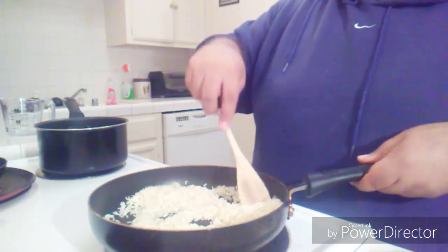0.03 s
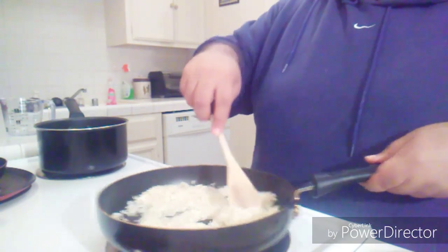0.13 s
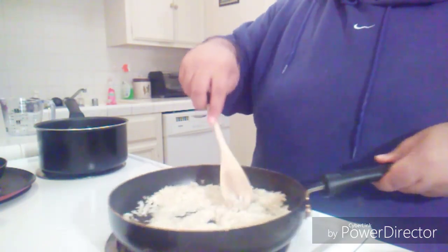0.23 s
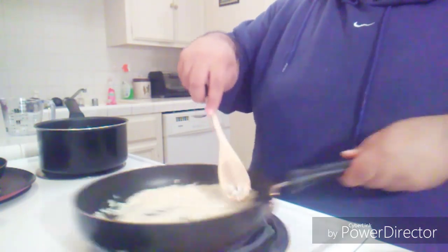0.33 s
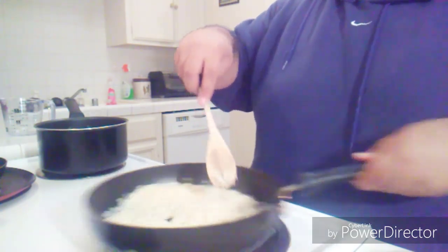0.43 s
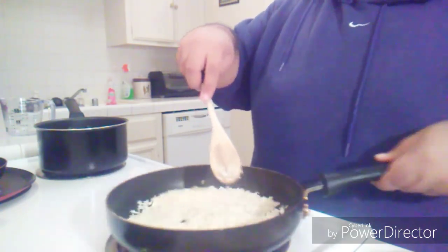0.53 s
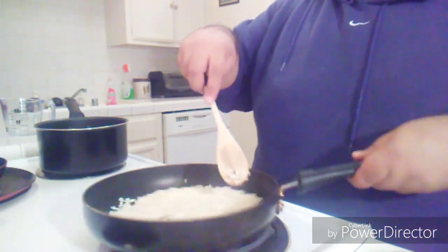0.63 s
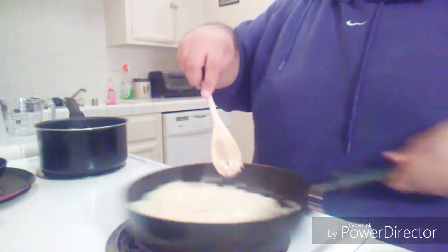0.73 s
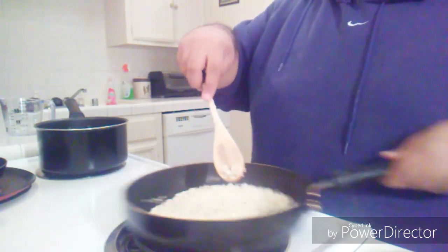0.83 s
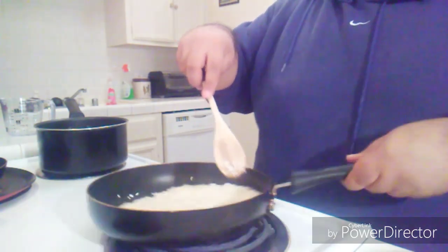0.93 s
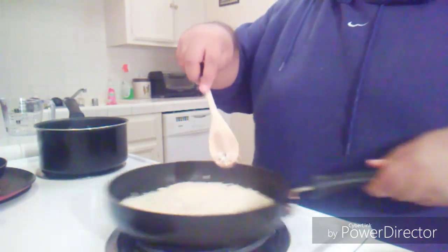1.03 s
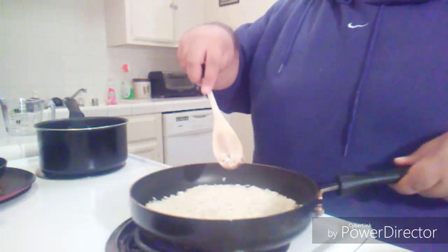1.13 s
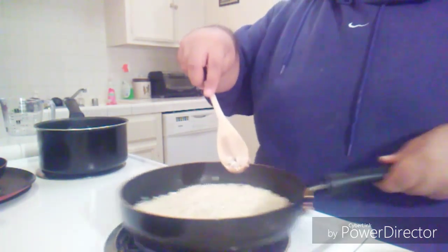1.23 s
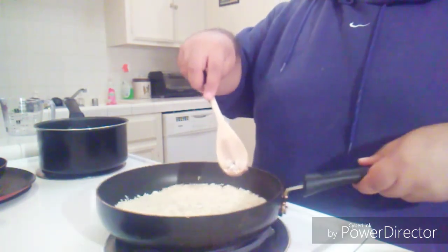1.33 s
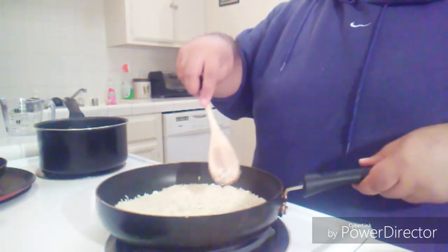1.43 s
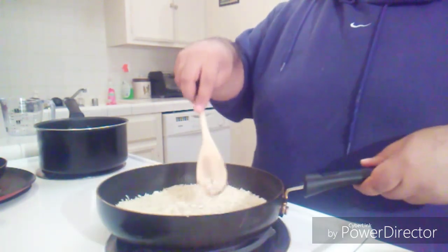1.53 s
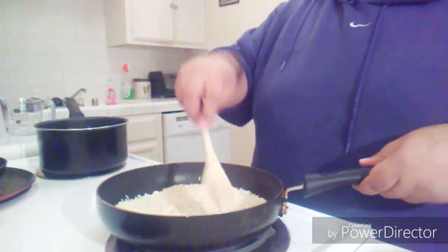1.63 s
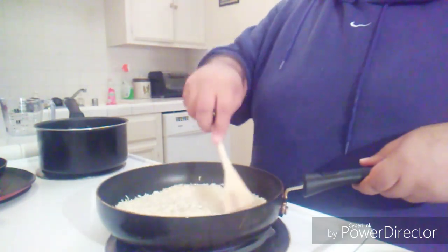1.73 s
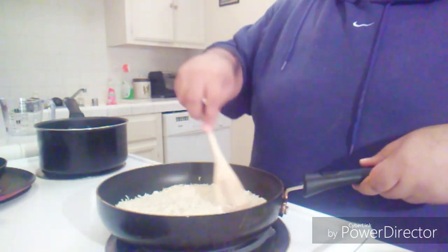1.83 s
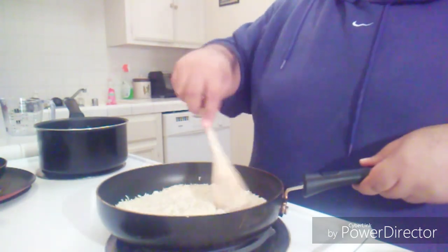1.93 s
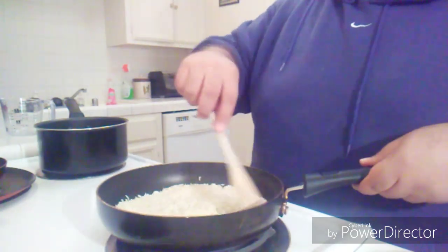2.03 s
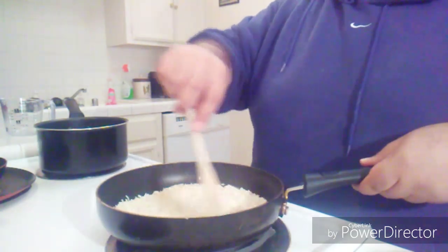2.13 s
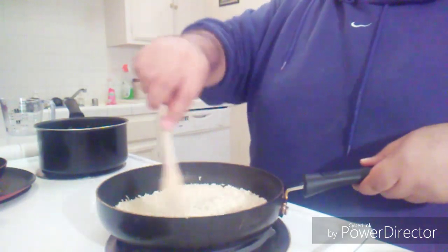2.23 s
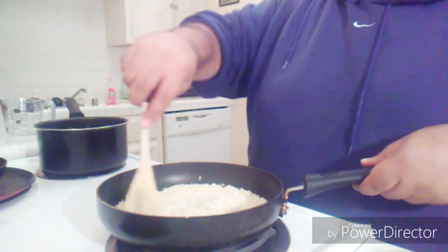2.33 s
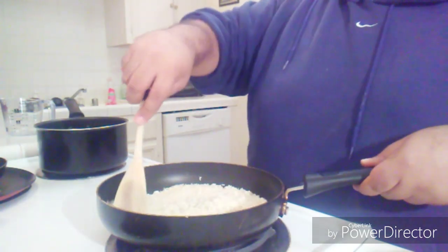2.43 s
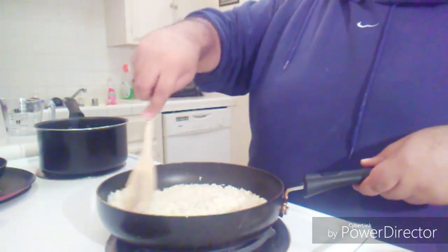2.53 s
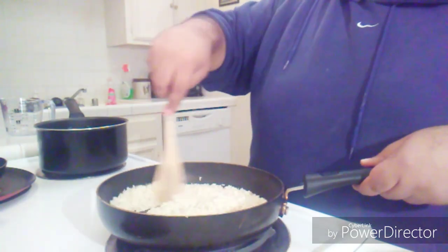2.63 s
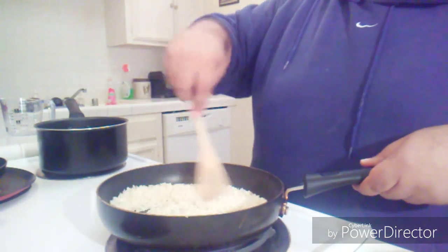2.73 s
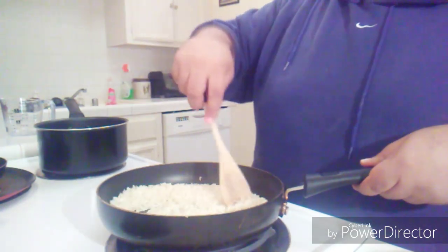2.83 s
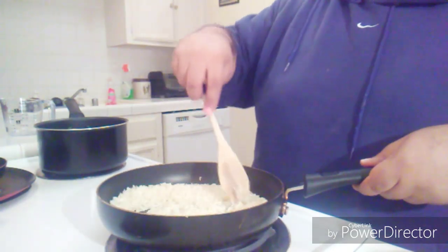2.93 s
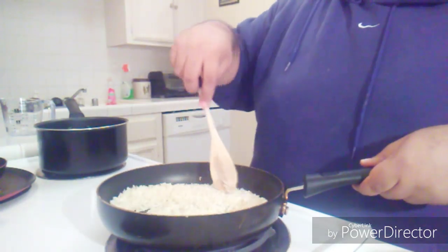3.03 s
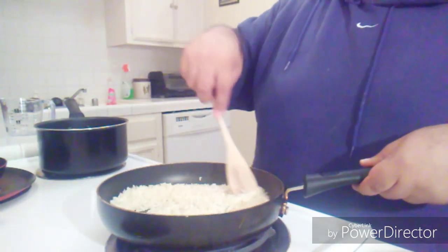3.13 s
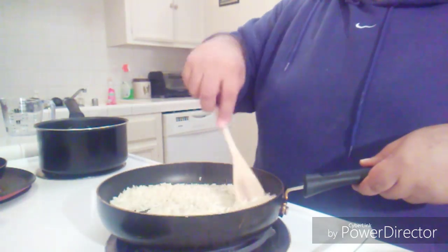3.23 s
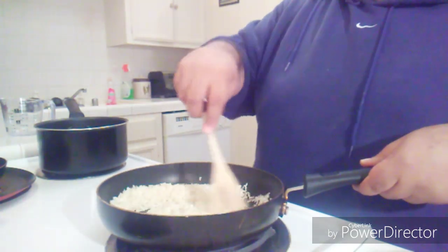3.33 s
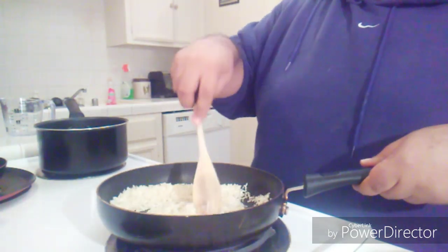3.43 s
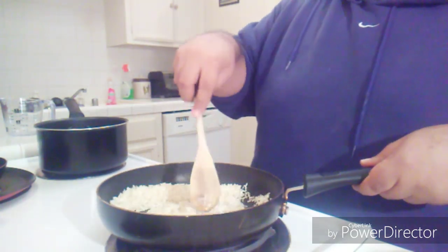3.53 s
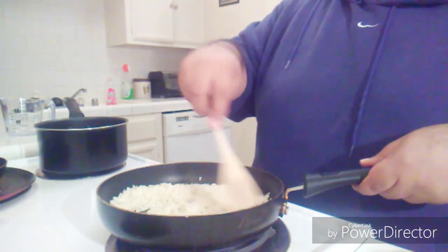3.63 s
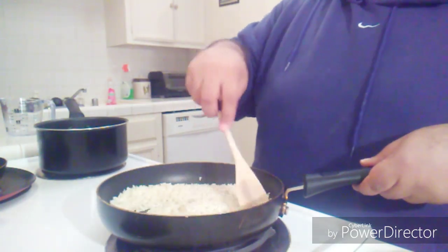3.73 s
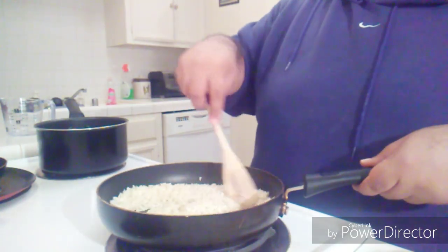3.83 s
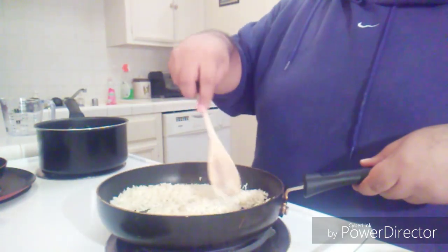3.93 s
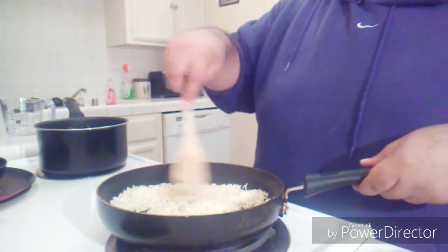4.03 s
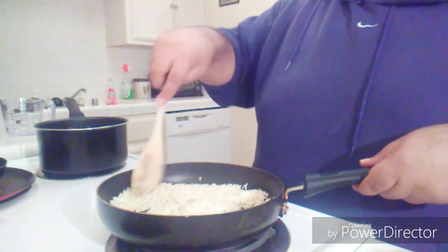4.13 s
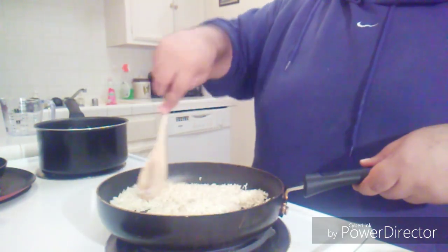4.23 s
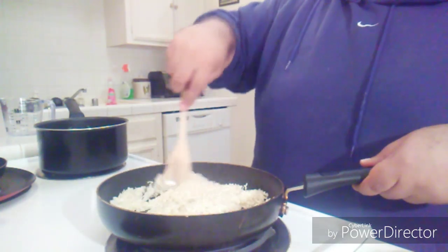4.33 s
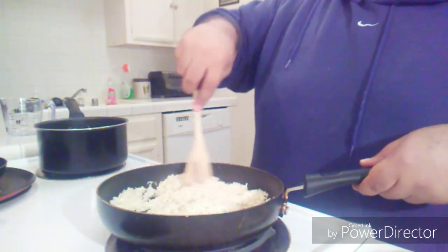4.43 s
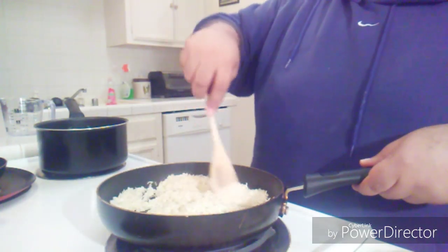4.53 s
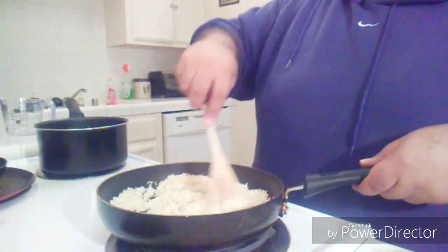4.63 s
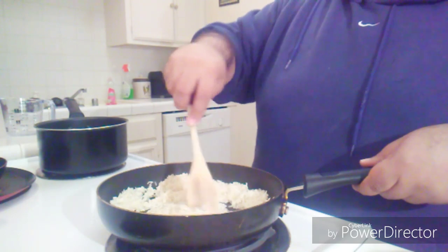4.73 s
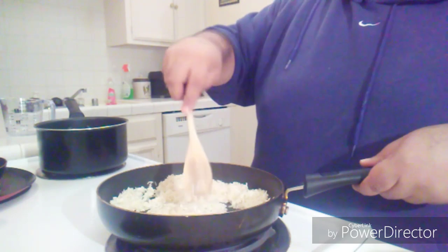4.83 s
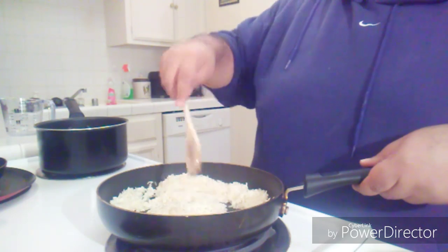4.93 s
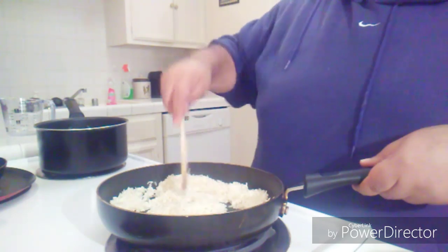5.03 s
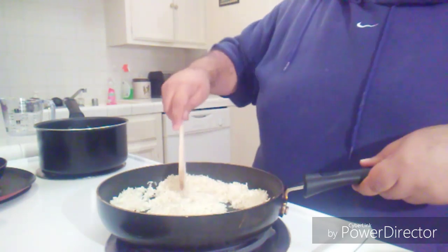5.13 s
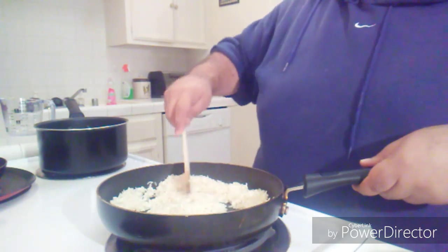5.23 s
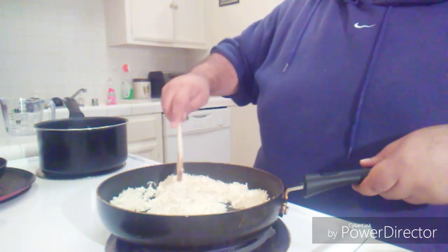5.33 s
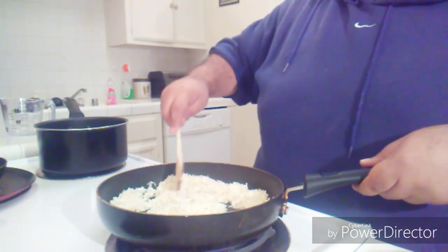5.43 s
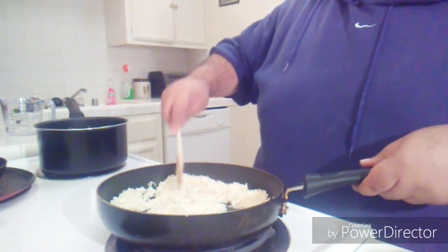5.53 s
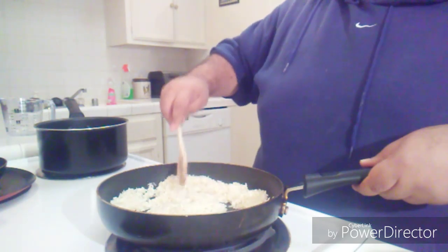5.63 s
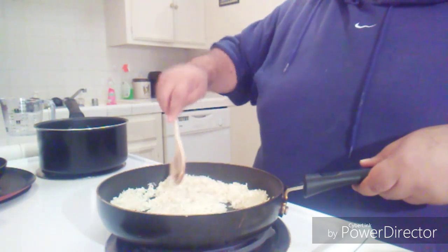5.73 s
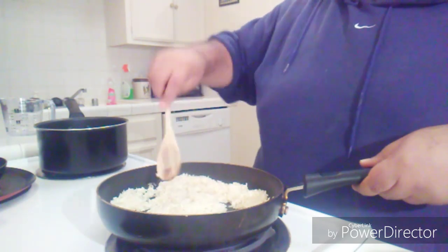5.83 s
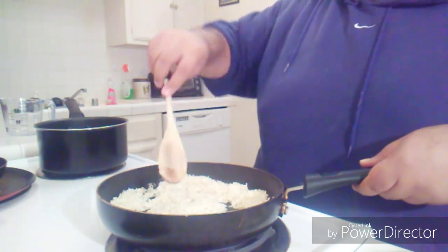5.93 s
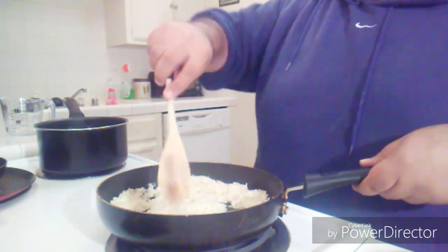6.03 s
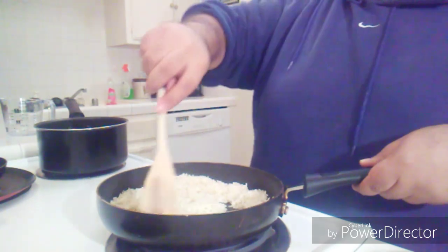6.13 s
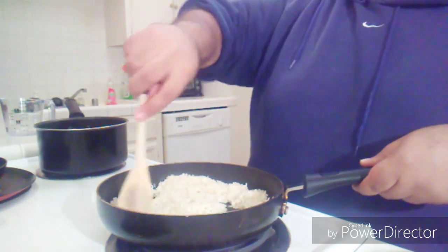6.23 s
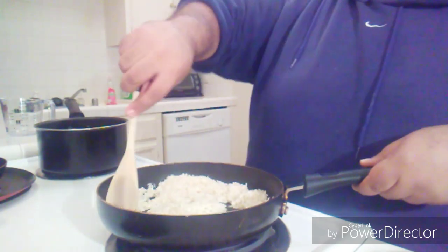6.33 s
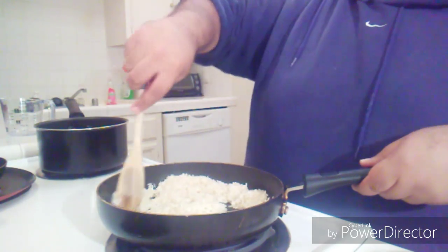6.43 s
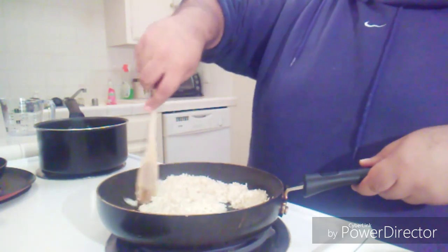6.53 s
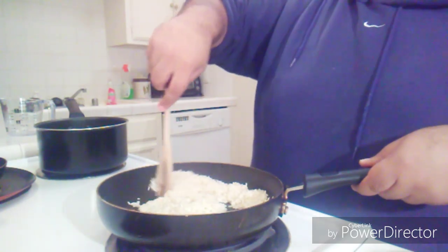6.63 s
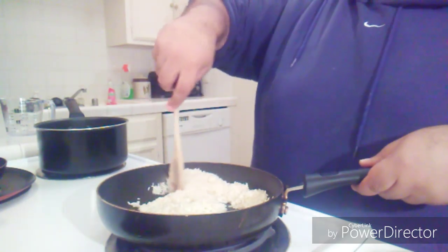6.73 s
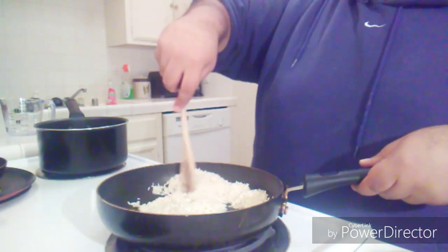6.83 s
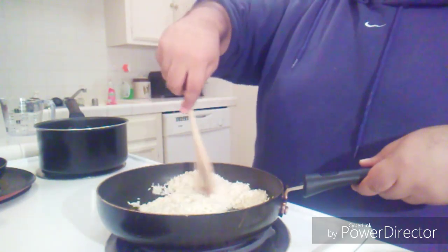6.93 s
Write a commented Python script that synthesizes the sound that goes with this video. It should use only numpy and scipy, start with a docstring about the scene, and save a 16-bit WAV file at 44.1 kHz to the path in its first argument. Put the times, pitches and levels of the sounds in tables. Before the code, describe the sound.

Dry rice slides in a rattling pan, followed by short scraping, rustling spatula strokes and three hard wooden knocks.

```python
"""A small kitchen: raw rice in a nonstick frying pan on a stove. The pan is shaken and clatters on its
burner as the heap slides. A wooden spatula ploughs through the grains in short strokes, sticking and
slipping on the pan, and is rapped on it three times. A faint drone, like an engine outside, sinks to
idle. A limiter catches the loudest blows."""
import sys
import numpy as np
from scipy import signal
from scipy.fft import rfft, irfft, next_fast_len
from scipy.io import wavfile
from scipy.ndimage import uniform_filter1d, minimum_filter1d, map_coordinates

SR = 44100
rng = np.random.default_rng(int(sys.argv[2]) if len(sys.argv) > 2 else 0)


def dump_mix(stems):
    """Bounce the given channels to the path in sys.argv[1] as a 16-bit WAV at rate SR."""
    frames = np.atleast_2d(stems).T  # one column per channel
    limited = np.clip(frames, -1, 1)  # hard clip at full scale
    pcm = np.round(limited * 32767).astype(np.int16)
    wavfile.write(sys.argv[1], SR, pcm)


N = 308259

# spectra: f/Hz, level/dB
STOVE_THUD = [(30, -43.5), (70, -19), (105, -5.5), (145, 3), (200, -5.5), (280, -3.5), (430, -2),
              (620, -11), (1200, -55.5)]
BURNER_GRIND = [(25, -42.5), (60, -12), (120, 0.5), (400, -1.5), (800, -1), (1100, -2), (2000, 1),
                (3000, -11.5), (5000, -20.5), (15000, -63)]
RICE_SPLASH = [(500, -49.5), (1800, -20), (3000, -4), (4300, 3), (5100, 1), (6100, 5.5), (6800, -1.5),
               (7500, -9.5), (8700, -20), (11000, -25), (15500, -34)]
RICE_RUSTLE = [(400, -40.5), (1500, -26), (3200, -19.5), (4100, -4.5), (4800, -7.5), (6050, -1), (6800, -5),
               (7500, -12), (8600, -19.5), (11000, -25), (15500, -34)]


def amp(db):
    """Decibels to gain."""
    return 10 ** (np.asarray(db) / 20)


def unit(x):
    """x at rms 1."""
    return x / np.sqrt(np.mean(x ** 2) + 1e-20)


def along(points, hz):
    """Interpolate (f/Hz, value) points over log frequency."""
    f, v = np.transpose(points)
    return np.interp(np.log(hz + 1), np.log(f + 1), v)


def fade(t, t60_s):
    """Exponential decay, 60 dB in t60_s."""
    return np.exp(-np.log(1000) * t / t60_s)


def wobble(rate_hz):
    """Smooth random curve, rate_hz knots a second."""
    knots = rng.standard_normal(int(N * rate_hz / SR) + 4)
    return map_coordinates(knots, [np.arange(N) * rate_hz / SR])


def add(track, start_s, sound):
    """Mix a sound in at start_s."""
    part = track[max(round(start_s * SR), 0):][:len(sound)]
    part += sound[:len(part)]


def contacts(rate_hz, spread_db, count=N):
    """Tiny random impacts of log-normal size."""
    sizes = amp(spread_db * np.clip(rng.standard_normal(count), -2, 2)) * rng.choice([-1, 1], count)
    return sizes * (rng.random(count) < rate_hz / SR)


def strokes(rows, attack_s, t60_s):
    """Gain of overlapping movements. Rows: t/s, length/s, mid level/dB, start-to-end swell/dB."""
    gain = np.zeros(N)
    for start_s, length_s, db, swell_db in rows:
        t = np.arange(N) / SR - start_s
        onset = np.clip(t / attack_s, 0, 1)
        held = amp(db + swell_db * (np.clip(t / length_s, 0, 1) - .5))
        release = fade(np.maximum(t - length_s, 0), t60_s)
        gain = np.maximum(gain, onset * held * release)
    return gain


def pan_gain(hz, bed_db=-13):
    """The pan's resonances stand above a bed of dense, damped ones."""
    # pan on its burner: f/Hz, width/Hz, level/dB
    modes = [(132.4, 34, 0.5), (243, 14, 1), (282.7, 8, -5.5), (426, 72, -1.5), (701, 45, -2),
             (862.6, 60, 1), (1404, 110, -11), (1565, 210, -7), (1940, 130, -15), (2300, 26, -12.5),
             (2540, 270, -16), (2890, 130, -11.5), (3650, 98, -8)]
    peaks = sum(amp(db) ** 2 / (1 + (2 * (hz - centre) / width) ** 2) for centre, width, db in modes)
    return np.sqrt(peaks + amp(bed_db) ** 2)


def colour(x, spectrum, ring=0, size=8192):
    """Minimum-phase filter; ring 0-1 is how freely the pan resonates."""
    hz = np.fft.rfftfreq(size, 1 / SR)
    gain = amp(along(spectrum, hz)) * pan_gain(hz) ** ring
    cepstrum = irfft(np.log(gain))
    causal = np.r_[cepstrum[0], 2 * cepstrum[1:size // 2]]
    kernel = irfft(np.exp(rfft(causal, size)))
    return signal.fftconvolve(x, kernel)[:len(x)]


def rim(x, path_s, travel, rate_hz):
    """The pan's wall returns a weak copy; its delay shifts as things move."""
    n = np.arange(N)
    delay = path_s * SR * np.exp(travel * wobble(rate_hz))
    return unit(x + .5 * np.interp(n - delay, n, x))


def blow(force, spectrum, db, ring=0):
    """Sound of a brief force, its loudest moment at db."""
    sound = colour(force, spectrum, ring)
    peak_power = uniform_filter1d(sound ** 2, size=300).max()
    return amp(db) * sound / np.sqrt(peak_power + 1e-20)


def blows(rows, knock_t60_s, thud_t60_s, splash_t60_s):
    """Each blow chatters on the pan, thumps the stove top and makes the rice jump."""
    # knock spectrum: f/Hz, level/dB
    knock = [(150, -33.5), (300, -12), (420, -0.5), (650, 7), (900, 4.5), (1150, 0), (1900, 6),
             (3000, -4.5), (5000, -30), (15000, -47)]
    out, t = np.zeros(N), np.arange(SR // 2) / SR
    for s, knock_db, thud_db, splash_db in rows:
        chatter, thump, jump = (contacts(9000, 4.6, len(t)) for _ in range(3))
        add(out, s, blow(chatter * fade(t, knock_t60_s), knock, knock_db, ring=0.88))  # contact damps
        add(out, s, blow(thump * fade(t, thud_t60_s), STOVE_THUD, thud_db, ring=1))
        add(out, s, blow(jump * fade(t, splash_t60_s), RICE_SPLASH, splash_db))
    return out


def volleys(rows, spectrum, t60_s, attack_s, ring=0):
    """Short runs of tiny impacts that build up and die."""
    out, t = np.zeros(N), np.arange(SR // 4) / SR
    shape = (1 - np.exp(-t / attack_s)) * fade(t, t60_s)
    for s, db in rows:
        add(out, s, blow(contacts(3400, 0.46, len(t)) * shape, spectrum, db, ring))
    return out


def air(level_db=-62):
    """Faint hiss of the quiet kitchen."""
    # room tone: f/Hz, level/dB
    spectrum = [(25, -8.5), (50, -1.5), (80, -3), (120, -0.5), (200, -11), (450, -19.5), (800, -17.5),
                (1500, -20.5), (3000, -26), (4500, -26.5), (6200, -20.5), (9000, -26.5), (15500, -33)]
    return amp(level_db) * unit(colour(rng.standard_normal(N), spectrum))


def kitchen(x, delay_s=.004):
    """Echo off hard walls and cupboards; the treble dies first."""
    # reverberation: f/Hz, t60/s
    decay = [(120, 0.51), (500, 0.42), (2000, 0.43), (6000, 0.35), (12000, 0.41)]
    hz, t, z = signal.stft(rng.standard_normal(SR * 3 // 5), SR, nperseg=256)
    tail = signal.istft(z * fade(t, along(decay, hz)[:, None]), SR, nperseg=256)[1]
    tail = np.pad(tail / np.linalg.norm(tail), (int(delay_s * SR), 0))
    return signal.fftconvolve(x, tail)[:N]


def engine(octave_db=-6, wall_db_per_octave=24, jitter_rad=.5):
    """Only the two lowest orders pass the walls, the upper one mostly near idle."""
    # distant engine: t/s, firing rate/Hz, level/dB
    run = [(0, 81.7, -70), (3.201, 82.04, -63), (3.32, 84.5, -47), (3.549, 81.7, -44), (3.702, 81.8, -58),
           (3.85, 82.9, -39), (4.16, 81.4, -41), (4.27, 65.6, -60), (4.7, 58.5, -47), (5.0, 51.6, -50),
           (5.7, 50, -52), (6.2, 49.44, -64)]
    s, hz, db = np.transpose(run)
    t = np.arange(N) / SR
    firing_hz = np.interp(t, s, hz)
    phase = 2 * np.pi * np.cumsum(firing_hz) / SR + jitter_rad * wobble(21)  # uneven firing
    octave = amp(octave_db - wall_db_per_octave * np.log2(firing_hz / hz.min()))
    gain = amp(np.interp(t, s, db) + 2.9 * wobble(15))
    return gain * (np.sin(phase) + octave * np.sin(2 * phase))


def sizzle(level_db=-67):
    """Rice ticks faintly on the hot metal throughout."""
    # ticks: f/Hz, level/dB
    spectrum = [(2000, -34), (3300, -30.5), (4500, -16.5), (6300, -0.5), (8000, -14.5), (15500, -14.5)]
    return amp(level_db) * unit(colour(contacts(1800, 2), spectrum))


def ping(start_s=2.002, attack_s=0.0033, jitter_rad=.35):
    """The burner rings thinly and unevenly as the pan shifts."""
    # burner modes: f/Hz, level/dB, t60/s
    modes = [(3780, -37, .1), (5610, -30, 0.14), (6648, -22, 0.093)]
    out, t = np.zeros(N), np.arange(N) / SR
    tone = sum(amp(db) * fade(t, t60_s) * np.sin(2 * np.pi * hz * t + jitter_rad * wobble(440))
               for hz, db, t60_s in modes)
    add(out, start_s, tone * (1 - np.exp(-t / attack_s)))
    return out


def flicks():
    """The blade flicks a few grains."""
    # flicks: t/s, level/dB
    events = [(1.829, -33.5), (2.127, -52), (2.68, -30.5), (3.061, -56), (3.134, -43.5), (3.201, -30.5),
              (4.121, -57), (4.163, -64.5), (4.209, -39), (4.326, -36.5), (4.94, -43.5), (6.456, -37)]
    return volleys(events, RICE_RUSTLE, t60_s=0.075, attack_s=0.0084)


def catches():
    """The blade catches on the metal and slips free."""
    # catches: t/s, level/dB
    events = [(2.671, -37), (2.818, -23.5), (2.847, -18.5), (3.256, -28), (3.535, -32.5), (3.605, -35.5),
              (4.609, -30), (4.717, -22), (4.796, -26), (4.812, -18), (4.831, -28), (5.227, -32.5),
              (6.704, -39)]
    # slip spectrum: f/Hz, level/dB
    slip = [(100, -16.5), (450, -38), (650, 2), (900, 6), (1200, -2.5), (1900, 0), (3000, -7.5),
            (6000, 0.5), (9000, -37.5), (15000, -65.5)]
    return volleys(events, slip, t60_s=0.053, attack_s=0.0034, ring=1)


def dragging(swell_db=-10.5):
    """Pushed by the spatula, the pan gives way on its burner, slows and stops."""
    # drags: t/s, length/s, level/dB
    drags = [(-0.01, 0.043, -40), (0.08, 0.08, -42), (1.837, 0.067, -35), (2.18, 0.14, -39),
             (2.335, 0.27, -55), (3.246, 0.062, -38.5), (3.822, 0.1, -49.5), (4.536, 0.28, -55),
             (6.367, 0.065, -47), (6.744, 0.056, -52)]
    # friction spectrum: f/Hz, level/dB
    friction = [(30, -29.5), (80, -4), (135, 3), (180, -0.5), (250, -14.5), (350, -12.5), (480, -4),
                (650, -7), (1100, -15.5), (4000, -44.5)]
    gain = strokes([(*row, swell_db) for row in drags], attack_s=0.018, t60_s=0.55)
    return gain * unit(colour(contacts(2100, 4.3), friction, ring=1))


def rustle(clumps, times_s, pitch_hz, focus_db=4.5, width_oct=0.17, patchy_db=2.7):
    """Tumbling grains: the blade favours a moving band; each clump has its own colour."""
    grains = colour(clumps * contacts(5200, 0.8), RICE_RUSTLE)
    hz, t, z = signal.stft(grains, SR, nperseg=512)
    offset_oct = np.log2((hz[:, None] + 1) / np.interp(t, times_s, pitch_hz))
    focus = np.exp(-.5 * (offset_oct / width_oct) ** 2)
    patches = uniform_filter1d(rng.standard_normal(z.shape), size=4, axis=0)
    patches = unit(uniform_filter1d(patches, size=9, axis=1))
    gain = amp(focus_db * focus + patchy_db * patches)
    return unit(signal.istft(z * gain, SR, nperseg=512)[1][:N])


def stirring(attack_s=0.035, rice_t60_s=0.19, pan_t60_s=0.083, ring_swell_db=5.5):
    """Wood sticks and slips on the pan; grains tumble off the blade in small clumps."""
    # strokes: t/s, length/s, rice/dB, rice swell/dB, rasp/dB, pressure swell/dB, ring/dB, rustle f/Hz
    moves = [(-0.01, 0.2, -38, -9, -43, -11, -45, 5370), (0.158, 0.26, -35.5, -10, -35.5, 20, -35.5, 5300),
             (1.814, 0.18, -35, 5, -40.5, 9, -44.5, 6400),
             (2.33, 0.32, -40.5, 2.5, -47.5, -19.5, -49, 5960),
             (2.654, 0.15, -33, -9, -35.5, -4.5, -41, 5660), (2.843, 0.11, -34, -13, -35, -2, -37, 5300),
             (3.125, 0.068, -51.5, -2.5, -56.5, -13, -72, 5770),
             (3.204, 0.05, -33.5, -3, -41, 0, -47, 5700), (3.24, 0.17, -34, -8.5, -41.5, -23, -43, 5950),
             (3.406, 0.19, -35.5, 1.5, -45.5, 6.5, -41.5, 5340),
             (3.806, 0.13, -41.5, 1, -56.5, 9, -52, 6000), (3.883, 0.12, -36, -7.5, -43.5, -6, -42, 5450),
             (4.306, 0.084, -44.5, 5, -62, 11, -68, 6340), (4.384, 0.2, -33, 0, -44, 15, -45.5, 5210),
             (4.588, 0.3, -33.5, -10, -35, -7, -31.5, 5360),
             (5.202, 0.029, -33.5, 8, -36.5, 19.5, -67, 5900), (6.366, 0.09, -49, 13, -65, -11, -45, 5850),
             (6.446, 0.37, -35, -13, -45.5, -7, -42.5, 6000),
             (6.817, 0.25, -54, -6.5, -58.5, 1.5, -68.5, 5770)]
    # rubbed pan's hollow note and wood's rasp: f/Hz, level/dB
    hollow = [(100, -36), (450, -26.5), (600, -21), (700, -13), (800, -6), (930, 9.5), (1050, -6),
              (1400, -23.5), (4000, -53)]
    scrape = [(100, -17), (300, -27), (520, -30), (750, -14.5), (1050, 1), (1400, -2), (2200, -5),
              (3200, -9.5), (6000, -22.5), (15000, -48)]
    s, length_s, rice_db, rice_swell_db, rasp_db, pressure_db, ring_db, rustle_hz = np.transpose(moves)
    push = strokes(zip(s, length_s, rice_db, rice_swell_db), attack_s, rice_t60_s)
    rasp = strokes(zip(s, length_s, rasp_db, pressure_db), attack_s, pan_t60_s)
    # the pan rings more freely as the blade nears its wall
    ring = strokes(zip(s, length_s, ring_db, pressure_db + ring_swell_db), attack_s, pan_t60_s)
    clumps = amp(0.4 * wobble(55))
    slips = clumps * amp(2 * wobble(28)) * contacts(1600, 0.54)
    rice = push * rustle(clumps, s + length_s / 2, rustle_hz)
    pan = ring * rim(colour(slips, hollow, ring=1), path_s=0.003193, travel=0.19, rate_hz=5)
    wood = rasp * rim(colour(slips, scrape, ring=0.87), path_s=0.001524, travel=0.28, rate_hz=3.9)
    return pan + wood + rice


def shower(pan_db=-4, hold_s=0.014):
    """Rice thrown up by a hard tap rains back, hissing on the heap and drumming on bare metal."""
    # showers: t/s, level/dB
    falls = [(2.157, -30), (5.705, -14.5)]
    hail = contacts(3700, 2.7)
    gain = strokes([(s, hold_s, db, 0) for s, db in falls], attack_s=0.0022, t60_s=0.3)
    heap = unit(colour(hail, RICE_SPLASH))
    metal = unit(colour(hail, BURNER_GRIND, ring=0.56))
    return gain * (heap + amp(pan_db) * metal)


def rebounds():
    """The pan drops back on its burner after each hard rap."""
    # landings: t/s, level/dB
    landings = [(5.433, -23.5), (5.595, -25), (5.75, -29.5)]
    return volleys(landings, STOVE_THUD, t60_s=0.12, attack_s=0.0013, ring=0.94)


def taps():
    """The spatula strikes the pan: light taps and three hard raps."""
    # strikes: t/s, knock/dB, thud/dB, rice splash/dB
    strikes = [(0.088, -26.5, -39.5, -24.5), (1.83, -33.5, -43.5, -42), (2.155, -18.5, -28.5, -28),
               (3.204, -42, -57, -46), (3.245, -61, -56.5, -24), (3.822, -50.5, -51, -62),
               (3.904, -43.5, -65, -24), (5.381, -7, -17.5, -11.5), (5.547, -8.5, -17, -10),
               (5.703, -5, -14.5, -3.5), (6.355, -26.5, -48, -49)]
    return blows(strikes, knock_t60_s=0.078, thud_t60_s=0.055, splash_t60_s=0.073)


def shaking(swell_db=-2, attack_s=0.0095, coast_t60_s=0.3):
    """Shoved, the pan judders across the burner and strikes it; the heap slides and coasts to rest."""
    # shoves: t/s, length/s, pan grind/dB, rice slide/dB
    shoves = [(0.275, 0.03, -25, -30), (0.295, 0.025, -15.5, -19), (0.396, 0.073, -14.5, -18.5),
              (0.53, 0.2, -19, -21), (0.631, 0.06, -16, -16.5), (0.728, 0.051, -14.5, -19.5),
              (0.853, 0.072, -17, -17.5), (0.969, 0.17, -14, -17.5), (1.087, 0.11, -16, -20),
              (1.227, 0.027, -11, -18), (1.367, 0.046, -17, -22), (1.434, 0.035, -22.5, -26.5),
              (1.6, 0.0083, -26.5, -35)]
    # pan strikes burner: t/s, knock/dB, thud/dB, rice splash/dB
    jolts = [(0.401, -14, -26.5, -13), (0.432, -22, -26, -9.5), (0.524, -14.5, -21.5, -12.5),
             (0.621, -10, -19.5, -8.5), (0.658, -13.5, -21.5, -16.5), (0.727, -16, -27.5, -11),
             (0.856, -19.5, -38.5, -10.5), (0.884, -6.5, -23, -5.5), (0.991, -14, -30.5, -12.5),
             (1.045, -9.5, -22, -7), (1.151, -17, -20, -16), (1.23, -11.5, -31.5, -3.5),
             (1.356, -14, -23.5, -18.5), (1.458, -14.5, -25.5, -18), (1.631, -44, -39.5, -45)]
    grind = strokes([(s, length_s, db, swell_db) for s, length_s, db, _ in shoves], attack_s, coast_t60_s)
    slide = strokes([(s, length_s, db, swell_db) for s, length_s, _, db in shoves], attack_s, coast_t60_s)
    judder = amp(3.2 * wobble(60))
    metal = colour(judder * contacts(1000, 0.84), BURNER_GRIND, ring=0.97)
    metal = rim(metal, path_s=0.00296, travel=.3, rate_hz=9)
    heap = unit(colour(judder * contacts(5000, 1.6), RICE_SPLASH))
    knocks = blows(jolts, knock_t60_s=0.14, thud_t60_s=0.3, splash_t60_s=0.14)
    return grind * metal + slide * heap + knocks


def scene(clatter_room_db=-6, stir_room_db=-10):
    """Pan, rice and spatula close by, in the kitchen's echo and hiss; the engine outside."""
    raps = taps() + rebounds()
    blade = catches() + flicks()
    clatter = raps + shaking() + shower()
    stir = blade + stirring() + dragging() + ping() + sizzle()
    echo = kitchen(amp(clatter_room_db) * clatter + amp(stir_room_db) * stir)
    return (clatter + stir + echo + air() + engine())[None]


def record(dry, top_hz=15650):
    """Fast limiter at full scale, then a brick-wall low-pass."""
    needed = 1 / np.maximum(np.abs(dry), 1)
    gain = uniform_filter1d(minimum_filter1d(needed, size=61), size=61)
    size = next_fast_len(N + SR // 4)
    passband = np.fft.rfftfreq(size, 1 / SR) < top_hz
    return irfft(rfft(dry * gain, size) * passband, size)[:, :N]


dry = scene()
out = record(dry)
dump_mix(out)
```